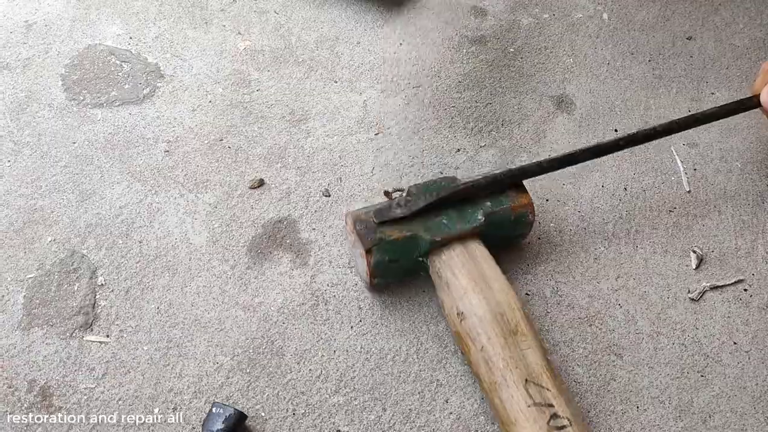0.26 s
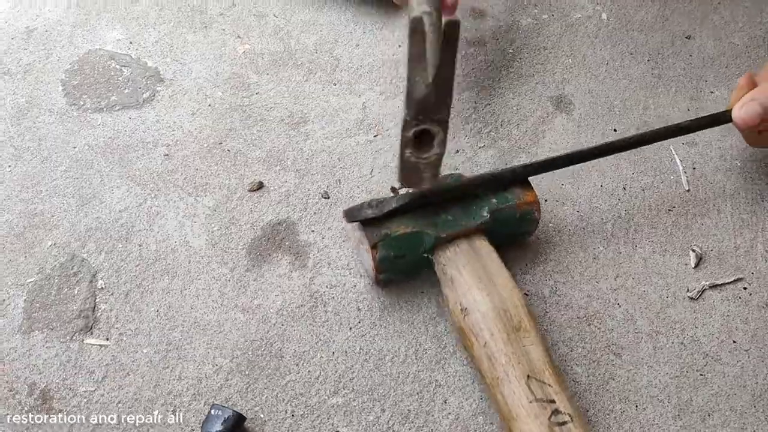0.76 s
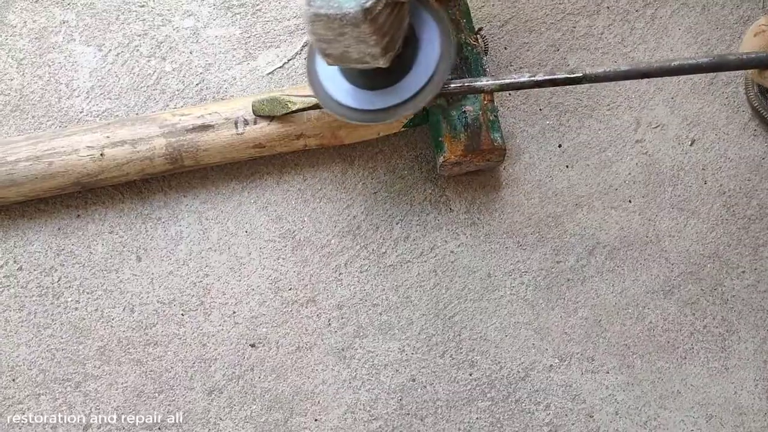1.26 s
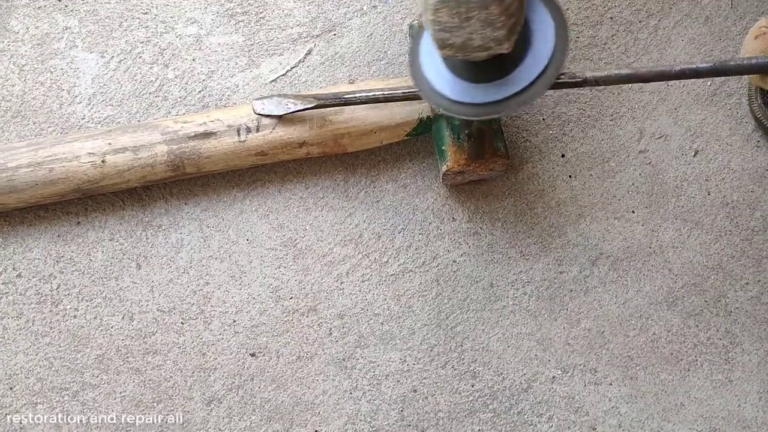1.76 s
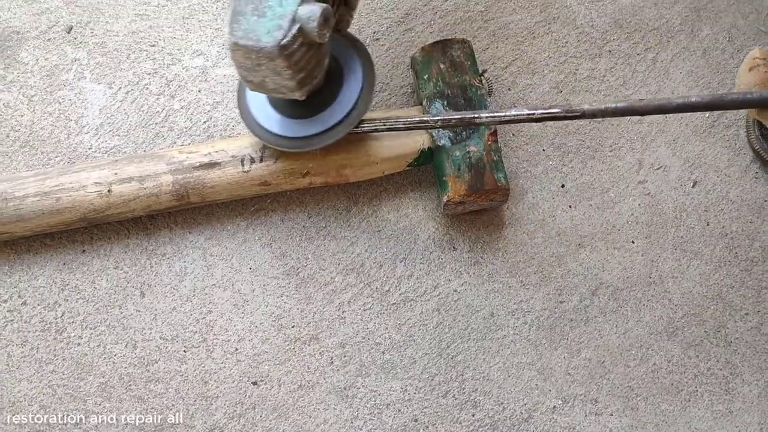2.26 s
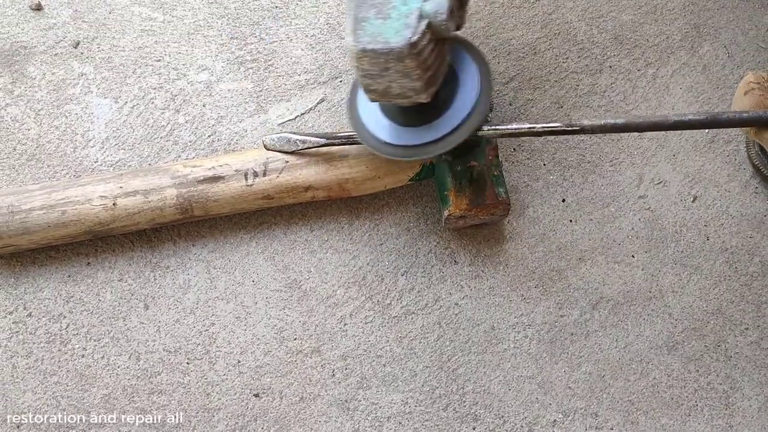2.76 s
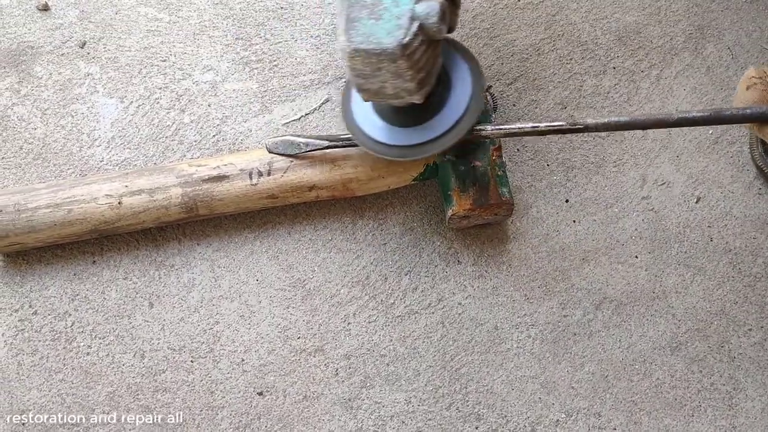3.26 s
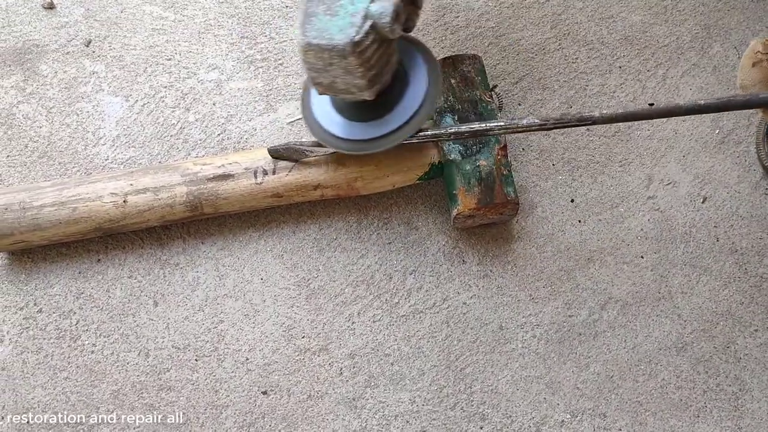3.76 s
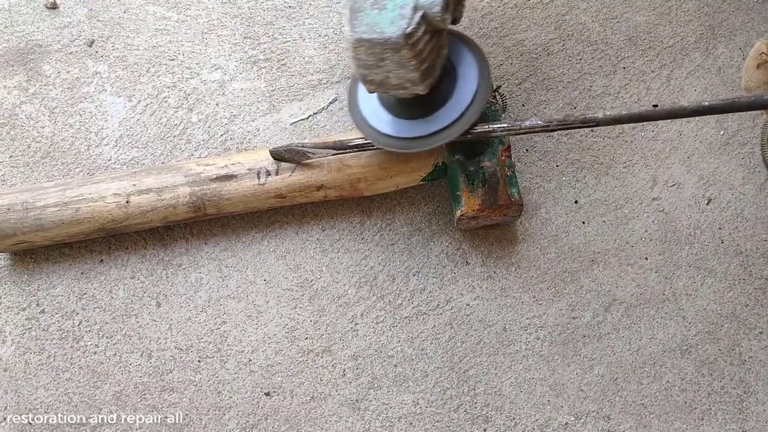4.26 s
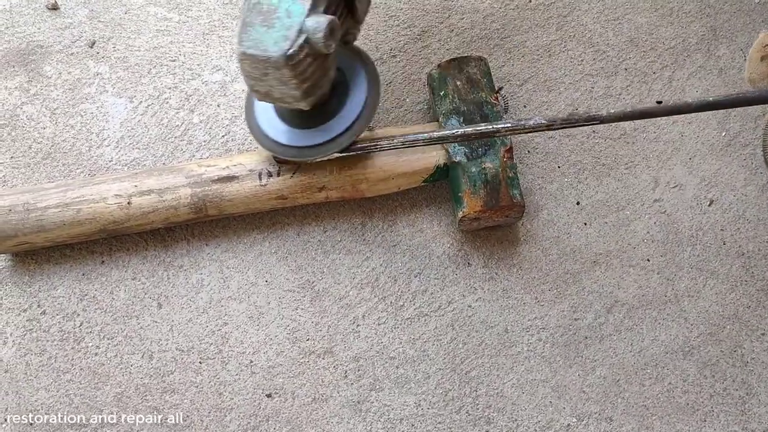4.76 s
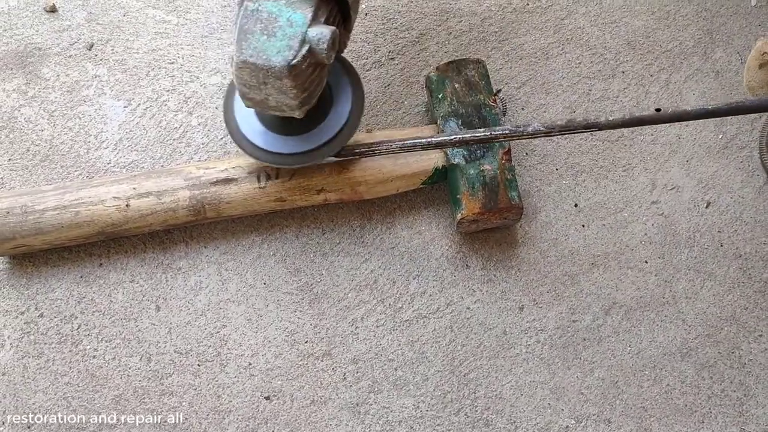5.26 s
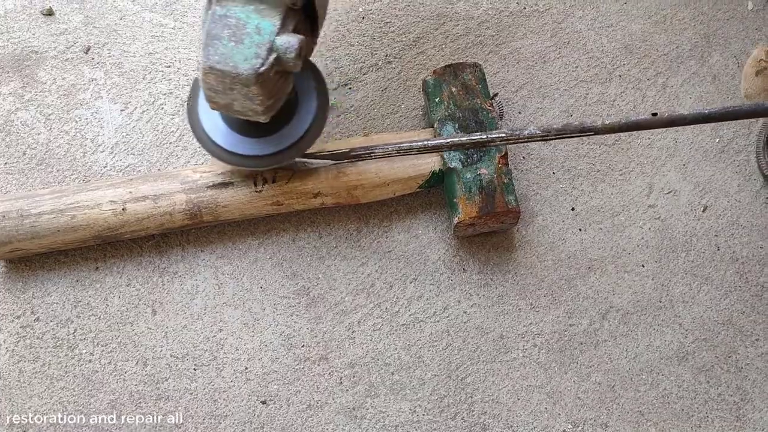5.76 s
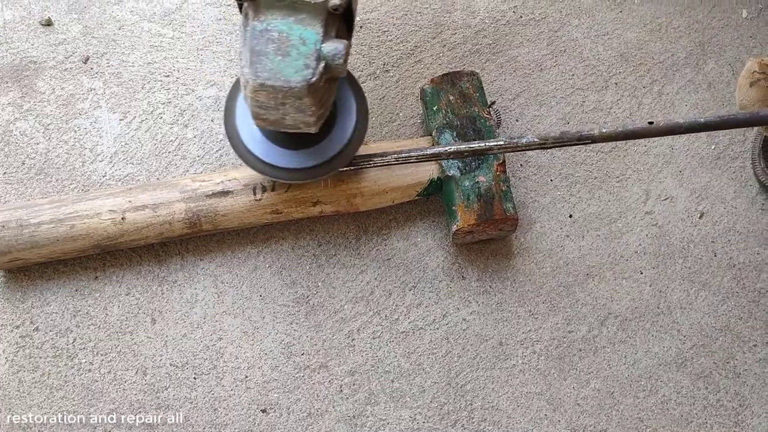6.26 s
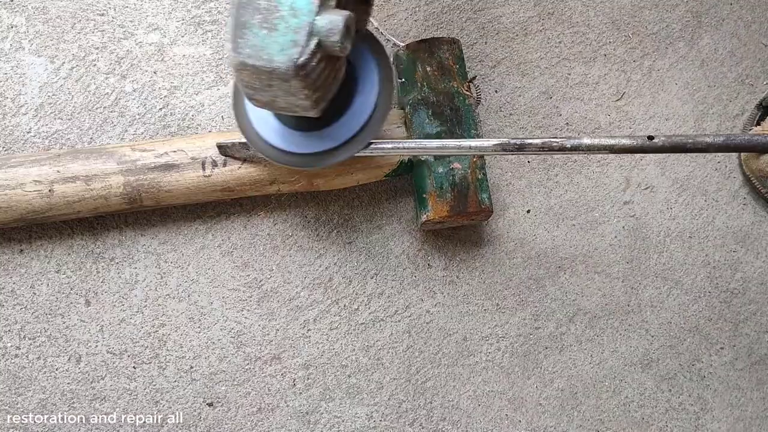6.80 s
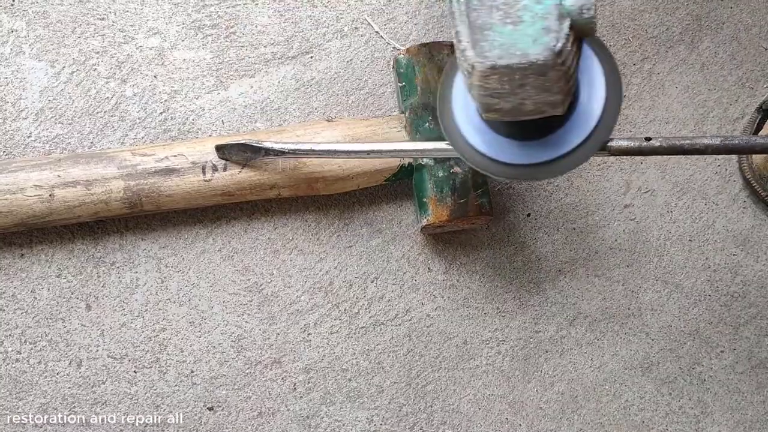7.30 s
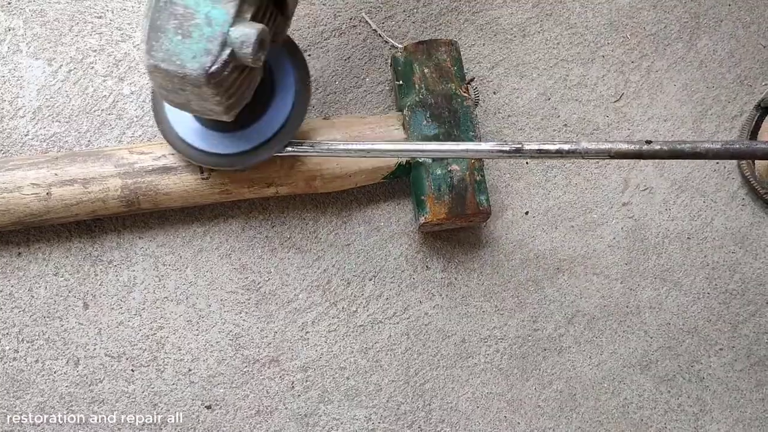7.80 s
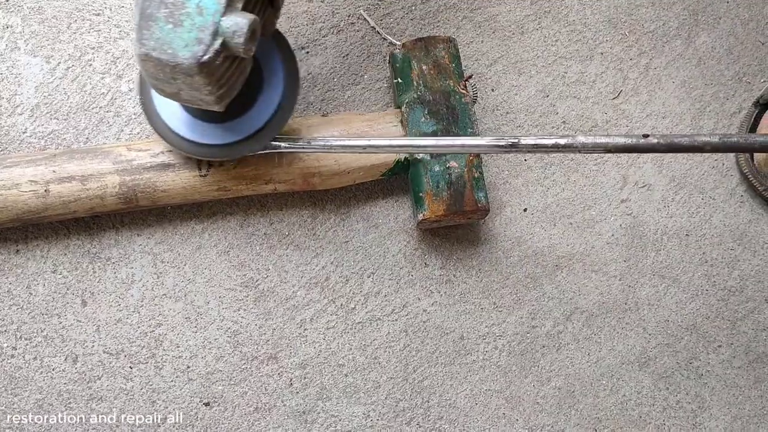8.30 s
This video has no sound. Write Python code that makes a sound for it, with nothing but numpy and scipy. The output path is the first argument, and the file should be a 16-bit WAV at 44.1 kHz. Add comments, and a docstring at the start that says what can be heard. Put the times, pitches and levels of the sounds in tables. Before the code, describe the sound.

A few hard metallic clanks in a small workshop, followed by a loud, continuous grinder with high whine, gritty growl, hiss and wind pops.

```python
"""A metal workshop: a small hammer strikes a steel rod on a heavy steel block, then an angle grinder works the rod.
Blows are noise cracks over decaying steel modes; the motor is a set of tones locked to one shaft speed.
The wheel is shaped noise: growl, hiss, sizzle and a grit pattern. Its air buffets and pops two microphone ports.
During the hammering the right port is muffled and the left one swings slowly after each blow."""
import sys
import numpy as np
from scipy import signal
from scipy.fft import rfft, irfft, next_fast_len
from scipy.io import wavfile
from scipy.ndimage import uniform_filter1d, map_coordinates

SR = 44100
rng = np.random.default_rng(int(sys.argv[2]) if len(sys.argv) > 2 else 0)


def wav_record(signal):
    """Record a signal, one row per channel, as 16-bit PCM in the file named by sys.argv[1]."""
    frames = np.transpose(np.atleast_2d(signal))
    bounded = np.clip(frames, -1, 1)
    # unit amplitude maps onto the largest positive 16-bit level
    quanta = np.round(bounded * 32767).astype(np.int16)
    wavfile.write(sys.argv[1], SR, quanta)


def amplitude_ratio(level_db):
    """Convert a level in decibels to the matching linear amplitude (field) ratio."""
    exponent = np.asarray(level_db, float) / 20
    return 10 ** exponent


N = 376613
T = np.arange(N) / SR

# Stretches of sound with short silences between: hammer, grinder, grinder [start t/s, end t/s]
STRETCHES = [(-1, .8352), (.8672, 6.7135), (6.7338, 9)]

# Hammer blows [t/s, level/dB, 5-8 kHz ring level/dB, ring above 8 kHz level/dB, signed swing of the left port]
BLOWS = [(-.19, -7.5, -3, 0, 0.026), (0.132, -6, 5, -11, 0.41), (0.1954, -17.5, -15, -12, -0.043),
         (0.4588, -6.5, -6, 8, -0.72), (0.7798, -9, -18, 19, 0.65), (0.7915, -21, -2, 7, 0.31)]
# Ringing modes of rod and block [f/Hz, level/dB, decay by 60 dB t/s]
STEEL_MODES = [(475, -23.5, 0.088), (830, -19, 0.09), (1990, -12.5, 0.077), (2140, -5, 0.059),
               (2296, -1.5, 0.064), (2367, -2, 0.048), (2418, -0.5, 0.062), (2580, -24, 0.075),
               (3230, -10.5, .06), (4080, -12, 0.052), (6200, -17, 0.082), (6460, -14, 0.11),
               (6520, 2.5, 0.057), (6626, -3.5, 0.15), (6800, -13, 0.1), (7241, -19, .06), (7690, -22, .1),
               (8200, -18.5, 0.083), (10300, -30, .07), (11000, -36, 0.12), (12680, -23, 0.087),
               (14250, -22, .06), (15050, -25, .06)]
# Contact noise of a blow, relative spectrum [f/Hz, level per Hz/dB]
CRACK_SPECTRUM = [(100, -10.5), (500, -7), (1300, -12.5), (2300, 8), (3500, -10), (5000, -30), (6500, -2),
                  (8000, -16), (11000, -24), (15000, -16)]
# Muffling of the right port during the hammering [f/Hz, level/dB]
MUFFLE = [(300, -8.5), (1300, -8), (2600, -32), (3500, -37), (4500, -59), (13000, -44), (15000, -34)]
# Reverberation of the workshop's near walls [f/Hz, decay by 60 dB t/s]
NEAR_DECAY = [(150, 0.38), (700, 0.23), (2500, 0.18), (6500, 0.19), (15000, 0.19)]
# Workshop air, relative spectrum [f/Hz, level per Hz/dB]
AIR_SPECTRUM = [(30, 7), (150, -3), (500, -14), (2500, -45), (8000, -67)]

# Grinder swept along the rod [t/s, shaft f/Hz, place from 0 tip to 1 over the block]
GRINDER = [(.87, 454.3, .1), (1.22, 456.1, 0.041), (1.65, 458, 1), (1.84, 461, 1), (2.05, 459.5, 0.47),
           (2.25, 457.5, 0), (2.38, 460, 0.028), (2.62, 459, 0.85), (2.9, 458.5, 0.71), (3.1, 461, 0.3),
           (3.54, 472.4, 0.93), (3.86, 471, 1), (4.05, 472.7, 0.15), (4.3, 472, 0.71), (4.5, 473.3, 1),
           (4.85, 472.5, 0.57), (5.22, 475, 0.35), (5.55, 471.5, 0.42), (5.8, 471, 0.53),
           (6.3, 469.8, 0.51), (6.71, 463.5, 0.15), (6.74, 472, 0.76), (6.95, 469.3, 0.32), (7.3, 470.5, 1),
           (7.5, 471.3, 0.95), (7.95, 468.3, 0.069), (8.5, 467.5, 0.11)]
# Harder pushes on the wheel that make the motor sag [t/s, shaft speed lost f/Hz]
PUSHES = [(5.451, 3.2), (5.84, 2.85), (6.13, 3.5), (6.49, 3.25), (7.82, 2.46), (8.27, 2.9)]
# Fan blade tone, narrow in its beam as the grinder moves and tilts
# [t/s, left level/dB, right level/dB, left lead/rad]
BLADE = [(.9, -19, -26, 2.5), (1.27, -26, -27.5, 2.5), (1.37, -30, -24, 2.5), (1.52, -24, -19, 2.5),
         (1.68, -29, -20.5, 4), (1.95, -22, -19, 1.5), (2.18, -29, -30, 2), (2.42, -27, -32, 2.5),
         (2.62, -24, -19.5, 1.6), (2.9, -25, -22.5, 2), (3.1, -26, -36, 1.2), (3.35, -18, -23, 1.5),
         (3.52, -24.5, -18, -1.9), (3.8, -21.5, -27, 1), (4.1, -25, -40, 1), (4.42, -22.5, -19.5, -1.2),
         (4.7, -20.5, -28, -1.5), (5.05, -19, -44, -5.5), (5.3, -21, -29, -2.5), (5.48, -32, -29, -2),
         (5.62, -17.5, -23, -3), (5.77, -30, -25, -2), (5.85, -22, -27, -2.5), (6.07, -27, -24, -2.2),
         (6.16, -22, -25, -2), (6.23, -22.5, -30, -4.3), (6.35, -26, -24.5, -5), (6.71, -21, -24.5, -4),
         (6.74, -28, -27.5, -2), (7.1, -34, -24.5, -2.5), (7.35, -27, -31.5, -0.4),
         (7.75, -30.5, -27.5, -1.5), (7.87, -23.5, -30, -1.4), (8.05, -29, -29, -2),
         (8.3, -22.5, -35, -0.5)]
SPINDLE = 0.408  # wheel turns per shaft turn
# Wheel spindle and armature overtones [multiple of shaft speed, level/dB]
WEAK_ORDERS = [(SPINDLE, -51), (3.96, -43)]
# Layer rules [level at the tip/dB, gain over the block/dB, gain in the last stretch/dB]:
# shaft hum, second harmonic of the blade tone at each port, then the wheel's three noises
HUM_RULE = (-37, 4.3, 4.85)
OCTAVE_LEFT_RULE = (-28, -10, -16)
OCTAVE_RIGHT_RULE = (-51.5, -4.5, 17.5)
GROWL_RULE = (-24.5, 1, 0.11)
HISS_RULE = (-21, 0.63, 0.045)
SIZZLE_RULE = (-34, -4.5, 8.1)

# Growl of the wheel on steel, relative spectrum [f/Hz, level per Hz/dB]
GROWL_SPECTRUM = [(100, -22), (250, -14.5), (420, -8), (560, -17), (830, -10), (1300, -2.5), (2600, -1.5),
                  (3800, -1.5), (4250, -8), (4650, -11), (5100, -3.5), (5300, -5)]
# Casing resonances [f/Hz, width f/Hz, level over the growl/dB]
CASING = [(693, 203, 14), (967, 66, 8.5), (1120, 260, 5.5), (1654, 145, 6.5), (1912, 100, 4),
          (2170, 190, 3.5), (3130, 990, 5)]
# Likeness of the growl at the two ports [f/Hz, likeness 0-1]
ALIKE = [(100, 0.44), (200, 1), (500, 0.88), (1100, 0.84), (1500, 0.64), (2300, 0.32), (3000, 0.11),
         (4500, 0.16)]
# Phase by which the growl reaches the left port first [f/Hz, lead/rad]
LEAD = [(1000, 0.33), (1380, -1.56), (1980, -1.5), (3000, -4.5), (4650, -9.5)]
# Hiss at the left and right port, relative spectra [f/Hz, level per Hz/dB]
HISS_LEFT = [(5300, -15), (5900, -4), (7000, -4.5), (8200, -8), (9000, -10.5), (10300, -17), (12300, -19),
             (15300, -14.5)]
HISS_RIGHT = [(5300, -10.5), (5900, -8), (7000, -5.5), (8200, 0), (9000, -3), (10300, -25.5),
              (12300, -28.5), (15300, -17.5)]
# Sizzle of the sparks, relative spectrum [f/Hz, level per Hz/dB]
SIZZLE_SPECTRUM = [(8500, -16), (9500, 8.5), (10500, 0.5), (11300, 1), (11600, -11), (13000, -6),
                   (15000, -10)]
# Grit pattern on the wheel's rim, relative spectrum [f/Hz, level per Hz/dB]
GRIT_SPECTRUM = [(9500, -20), (10500, -10), (11600, 6), (13500, -2.5), (15500, -2)]

# Sudden air pops [t/s, level/dB]
POPS = [(1.839, -39), (2.365, -25), (2.459, -21), (3.668, -16.5), (3.849, -24), (6.737, -11), (6.832, -29),
        (7.214, -16), (7.228, -39), (7.29, -15), (7.343, -43), (7.538, -20), (7.584, -10.5), (3.497, -39),
        (3.744, -18)]
# Gusts of the wheel's air on the ports [start t/s, hold t/s, level/dB, left-right difference level/dB]
GUSTS = [(0.892, 0.11, -44, 12), (1.267, 0.023, -36, -6), (1.333, .09, -44, 12), (1.56, 0.07, -36, -7),
         (1.667, 0.01, -31, 12), (1.819, 0.013, -32.5, -18), (2.1, .02, -37.5, -6),
         (2.36, 0.018, -26.5, -25), (2.423, 0.043, -28.5, -14), (2.58, .02, -37, 11),
         (2.73, 0.18, -37.5, 3), (3.034, 0.024, -34.5, -22), (3.488, .01, -31.5, -18),
         (3.668, 0.015, -27, -24), (3.74, .18, -34.5, -15), (4.6, 0.11, -55, -8), (4.806, 0.2, -40, -11),
         (5.29, 0.08, -37, -2), (5.753, .04, -44, -12), (5.834, 0.12, -43, -21), (6.053, 0.019, -39, -19),
         (6.75, 0.021, -29, -28), (6.83, 0.057, -28.5, -27), (7.206, 0.055, -25, -30),
         (7.282, 0.097, -27.5, -34), (7.416, 0.19, -29.5, -18), (7.58, 0.11, -30, -32),
         (7.776, 0.029, -39, 3), (8.26, 0.028, -41, 11)]
# Steady draught under the gusts [t/s, left level/dB, right level/dB]
DRAUGHT = [(.9, -53, -44), (3.3, -48, -41), (3.5, -56, -44), (8.5, -55, -48)]
# Buffeting, relative spectrum [f/Hz, level per Hz/dB]
BUFFET_SPECTRUM = [(8, -4), (18, 3.5), (32, -7), (55, -3.5), (100, -6), (300, -18), (700, -26), (1500, -59)]

HUM_DB_PER_HZ, WHEEL_DB_PER_HZ = 0.2168, 0.01  # growth of hum and wheel noise with shaft speed
SLOW_HZ = 464.1  # shaft speed at which that growth is zero
SPLIT = np.array([[0.5], [-0.5]])  # shares a difference between left and right


def unit(x):
    """Scale each channel to rms 1."""
    return x / np.sqrt(np.mean(x ** 2, -1, keepdims=True) + 1e-20)


def along(points, hz):
    """Read (Hz, value) points on a log frequency axis."""
    f, v = np.transpose(points)
    return np.interp(np.log(hz + 1), np.log(f + 1), v)


def curves(rows):
    """One value per sample for each column after the time."""
    s, *cols = np.transpose(rows)
    return [np.interp(T, s, c) for c in cols]


def wobble(rate):
    """Two smooth random curves with rate knots a second."""
    knots = rng.standard_normal((2, 2000))
    return np.array([map_coordinates(k, [T * rate]) for k in knots])


def filtered(x, response):
    """Filter x by a complex response of frequency."""
    m = next_fast_len(x.shape[-1] + 8192)
    return irfft(rfft(x, m) * response(np.fft.rfftfreq(m, 1 / SR)), m)[..., :x.shape[-1]]


def sides(db, pan_db):
    """Left and right gain for a level and a left-right difference, at constant power."""
    pair = amplitude_ratio(SPLIT * pan_db)
    return amplitude_ratio(db) * pair / np.sqrt(np.mean(pair ** 2, axis=0))


def patchy(patchy_db):
    """Two white noises with patches of random gain over time and frequency."""
    z = signal.stft(rng.standard_normal((2, N)), nperseg=512)[2]
    field = uniform_filter1d(rng.standard_normal(z.shape), size=5, axis=1)
    field = uniform_filter1d(field, size=10, axis=2)
    return signal.istft(z * amplitude_ratio(patchy_db * field / field.std()), nperseg=512)[1][:, :N]


def steel_ring(t, bright_db, ping_db):
    """Struck modes of rod and block; the loose rod rattles on the block, a random phase that smears the ring."""
    hz, mode_db, t60 = np.transpose(STEEL_MODES)[..., None]
    high = hz > 5000
    level_db = mode_db + bright_db * (high & (hz < 8000)) + ping_db * (hz > 8000)
    level_db = level_db + 1.6 * rng.standard_normal(hz.shape)
    rattle_step = 0.1 * np.where(high, 0.45, 1)  # radians a sample
    rattle = rattle_step * np.cumsum(rng.standard_normal((len(hz), len(t))), axis=1)
    swell = 1 - np.exp(-t / np.where(high, 0.006, 0.0015))  # the high ring builds up after the contact
    decay = np.exp(-np.log(1000) * t / t60)
    return np.sum(amplitude_ratio(level_db) * decay * swell * np.sin(2 * np.pi * hz * t + rattle), axis=0)


def contact(t):
    """The contact itself: a noise crack with a fast and a slower decay, and a 700 Hz thud."""
    crack = unit(filtered(rng.standard_normal(len(t)), lambda f: amplitude_ratio(along(CRACK_SPECTRUM, f))))
    decay = amplitude_ratio(-6.5) * np.exp(-t / 0.0051) + amplitude_ratio(-15.0) * np.exp(-t / 0.016)
    thud = np.sin(2 * np.pi * 700 * t) * np.exp(-t / 0.0011)
    return crack * decay + amplitude_ratio(-9.0) * thud


def walls(length):
    """A fresh reverberation tail per port: near walls die fast, the far hall lingers faintly."""
    hz, t, z = signal.stft(rng.standard_normal((2, length)), SR, nperseg=256)
    t60 = along(NEAR_DECAY, hz)[:, None]
    near = amplitude_ratio(-60 * t / t60)
    far = amplitude_ratio(-26.5 - 60 * t / (4.0 * t60))
    tail = signal.istft(z * (near + far), SR, nperseg=256)[1][:, :length]
    return tail / np.linalg.norm(tail, axis=1, keepdims=True)


def hammer():
    """Each blow cracks, rings the steel at new strengths and fills the workshop; the ports hear it differently."""
    lead_in = SR // 2  # room for the blow that falls before time zero
    out, t = np.zeros((2, N + 2 * SR)), np.arange(SR) / SR
    for s, db, bright_db, ping_db, swing in BLOWS:
        blow = amplitude_ratio(-4.5) * steel_ring(t, bright_db, ping_db) + contact(t)
        wet = signal.fftconvolve(blow[None], walls(SR), axes=1)[:, :SR]
        left = blow + amplitude_ratio(0.5) * wet[0]
        # the muffled port hears the first shock, then a dull tail
        shock = blow * amplitude_ratio(10) * np.exp(-t / 0.0035)
        tail = filtered(blow + wet[1], lambda f: amplitude_ratio(7.5) / (1 + (f / 700) ** 2))
        right = filtered(shock + tail, lambda f: amplitude_ratio(along(MUFFLE, f)))
        overshoot = swing * np.clip(t / 0.026, 0, 1) * (1 - t / 0.039) * np.exp(-t / 0.035)
        out[:, round(s * SR) + lead_in:][:, :SR] += [amplitude_ratio(db) * left + overshoot, amplitude_ratio(db) * right]
    bump = amplitude_ratio(-37) * np.sin(2 * np.pi * 200 * t) * np.exp(-t / 0.0026)  # soft and low, between two blows
    out[:, round(0.383 * SR) + lead_in:][:, :SR] += bump
    return out[:, lead_in:][:, :N]


def shaft():
    """Shaft speed in Hz, sagging at each push, and its angle in radians."""
    sag = sum(lost * np.exp(-((T - s) / 0.08) ** 2) for s, lost in PUSHES)
    hz = curves(GRINDER)[0] - sag
    return hz, 2 * np.pi * np.cumsum(hz) / SR


def layer_db(rule):
    """Level in dB of a grinder layer from its place on the rod and the stretch."""
    tip_db, block_db, last_db = rule
    return tip_db + block_db * curves(GRINDER)[1] + last_db * (T > STRETCHES[-1][0])


def motor():
    """Shaft, spindle and fan blade tones, all tied to one speed and each a little unsteady."""
    shaft_hz, turns = shaft()
    *blade_db, lead = curves(BLADE)
    octave_db = np.array([layer_db(OCTAVE_LEFT_RULE), layer_db(OCTAVE_RIGHT_RULE)])
    hum_db = layer_db(HUM_RULE) + HUM_DB_PER_HZ * (shaft_hz - SLOW_HZ)
    blades = 12

    def tone(order, shake, lag):
        return np.sqrt(2) * np.sin(order * turns + shake * wobble(60)[0] + lag)

    out = amplitude_ratio(blade_db + 1.8 * wobble(17)) * tone(blades, 0.23, SPLIT * lead + 0.064 * wobble(8.0))
    out += amplitude_ratio(octave_db + 1.6 * wobble(9.2)) * tone(2 * blades, 0.22, 2.0 * wobble(2.73))
    out += sides(hum_db + 0.58 * wobble(19)[0], 3.0) * tone(1, 0.05, 0.12 * wobble(3.04))
    for order, db in WEAK_ORDERS:
        out += amplitude_ratio(db + 0.96 * wobble(25)) * tone(order, 0.2, 0.39 * wobble(2.02))
    return out


def growl():
    """Grit growls in the casing resonances, alike at both ports in the bass and apart higher up."""
    def casing(f):
        peaks_db = sum(db / (1 + (2 * (f - c) / w) ** 2) for c, w, db in CASING)
        return (f < 5300) * amplitude_ratio(along(GROWL_SPECTRUM, f) + peaks_db)

    def shares(f):
        mix_angle = np.arccos(np.clip(along(ALIKE, f), 0, 1)) / 2
        return casing(f) * np.array([np.cos(mix_angle), np.sin(mix_angle)])

    common, opposed = filtered(patchy(patchy_db=2.0), shares)
    pair = np.array([common + opposed, common - opposed])
    pair = filtered(pair, lambda f: np.exp(1j * SPLIT * along(LEAD, f)))
    pair = filtered(pair, lambda f: sides(0, along([(1500, 0.2), (2300, 2.4), (4500, 3.2)], f)))
    return pair / pair.std()


def hiss(turns):
    """Wheel on steel: noise above 5.3 kHz, pulsed by each wheel turn, its top treble flickering."""
    def ports_db(f):
        return np.array([along(HISS_LEFT, f), along(HISS_RIGHT, f)])

    body = filtered(patchy(patchy_db=2.0), lambda f: amplitude_ratio(ports_db(f)) * (f > 5300) * (f < 10000))
    top = filtered(patchy(patchy_db=3.5), lambda f: amplitude_ratio(ports_db(f) - 4) * (f >= 10000))
    beat = np.sin(SPINDLE * turns + 0.43 * wobble(12)[0])
    flicker_db = 0.6 * wobble(4.8)[0] + 1.5 * wobble(25)[0]  # the top treble comes and goes
    pair = body * (1 + 0.08 * beat) + top * amplitude_ratio(flicker_db) * (1 + 0.25 * beat)
    return pair / pair.std()


def sizzle():
    """Sparks sizzle as a faintly patchy noise above 8 kHz."""
    return unit(filtered(patchy(patchy_db=1.0), lambda f: amplitude_ratio(along(SIZZLE_SPECTRUM, f)) * (f > 8000)))


def wheel():
    """Growl, hiss and sizzle share the chatter of one uneven, hand-held contact."""
    shaft_hz, turns = shaft()
    speed_db = WHEEL_DB_PER_HZ * (shaft_hz - SLOW_HZ)
    chatter_db = 0.56 * wobble(40)[0] + 0.49 * wobble(90)[0]
    shared_db = speed_db + chatter_db
    out = amplitude_ratio(layer_db(GROWL_RULE) + shared_db) * growl()
    out += amplitude_ratio(layer_db(HISS_RULE) + shared_db) * hiss(turns)
    return out + sides(layer_db(SIZZLE_RULE) + shared_db, -36) * sizzle()


def grit():
    """The same grains pass once a wheel turn, so the top treble carries a comb of faint lines."""
    place = SPINDLE * shaft()[1] / (2 * np.pi) % 1
    grains = irfft(rfft(rng.standard_normal((2, 8192)))[:, :90], 8192)  # one smooth turn of the rim
    rim = grains[:, (place * 8192).astype(int)]
    worn_db = -3.5 * (T > 3.4)  # the comb is fainter once the motor runs faster
    comb = unit(filtered(rim, lambda f: amplitude_ratio(along(GRIT_SPECTRUM, f)) * (f > 9000)))
    return amplitude_ratio(-37 + worn_db + 2.5 * wobble(7.8)) * comb


def pops():
    """A vortex hitting a port, mostly the right: one inward push that rebounds, with a short low puff."""
    out, t = np.zeros((2, N + SR)), np.arange(SR // 10) / SR
    for s, db in POPS:
        u = t / rng.uniform(0.00052, 0.00092)
        push = 2.5 * u * (u - 2) * np.exp(-u)
        puff = unit(filtered(rng.standard_normal(len(t)), lambda f: 1 / (1 + (f / 350) ** 4)))
        pop = push + 0.14 * puff * np.exp(-t / 0.0093)
        out[:, round(s * SR):][:, :len(t)] += sides(db, -42) * pop
    return out[:, :N]


def blast():
    """Lumpy low buffeting, unrelated between the ports; strong gusts reach higher in pitch."""
    rise_db_per_s, fall_db_per_s = 700, 227
    power = amplitude_ratio(np.array(curves(DRAUGHT)) + 2.0 * wobble(8)) ** 2
    for s, hold, db, pan_db in GUSTS:
        near = slice(round((s - 0.3) * SR), round((s + hold + 0.3) * SR))
        before, after = np.clip(s - T[near], 0, None), np.clip(T[near] - s - hold, 0, None)
        away_db = rise_db_per_s * before + fall_db_per_s * after
        power[:, near] += (sides(db, pan_db) * amplitude_ratio(-away_db)) ** 2
    gain = np.sqrt(power)
    noise = filtered(rng.standard_normal((2, N)), lambda f: amplitude_ratio(along(BUFFET_SPECTRUM, f)) * (f > 5))
    low = filtered(noise, lambda f: 1 / (1 + (f / 45) ** 2))
    reach = np.clip(gain / amplitude_ratio(-23.5), 0, 1)  # share of the higher buffeting let in
    lumps = amplitude_ratio(4.3 * wobble(35))
    return gain * unit(lumps * (low + reach * (noise - low)))


def workshop_air():
    """The quiet air of the workshop: steady noise, mostly bass."""
    return amplitude_ratio(-55.5) * unit(filtered(rng.standard_normal((2, N)), lambda f: amplitude_ratio(along(AIR_SPECTRUM, f))))


def scene():
    """The hammering fills the first stretch, the grinder the other two, with silences between."""
    gates = [np.clip(np.minimum(T - a, b - T) / 0.0006, 0, 1) for a, b in STRETCHES]
    hammering = hammer() + workshop_air()
    grinding = motor() + wheel() + grit() + pops() + blast()
    return gates[0] * hammering + (gates[1] + gates[2]) * grinding


def top_cut(x):
    """Nothing passes above the cut-off."""
    return signal.sosfilt(signal.butter(12, 16970, fs=SR, output="sos"), x)


def record(dry):
    """Soft overload of the small microphones, then their band limit at 15750 Hz."""
    soft = dry / (1 + np.abs(dry / 0.55) ** 4) ** 0.31
    mix = filtered(soft, lambda hz: hz < 15750)
    return top_cut(mix)


dry = scene()
out = record(dry)
wav_record(out)
```